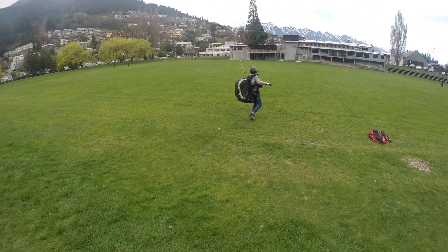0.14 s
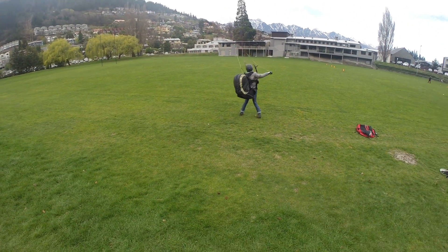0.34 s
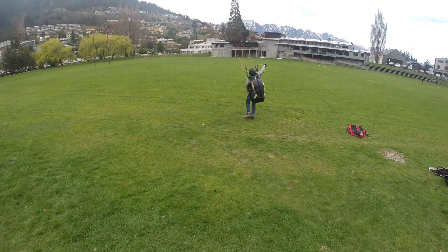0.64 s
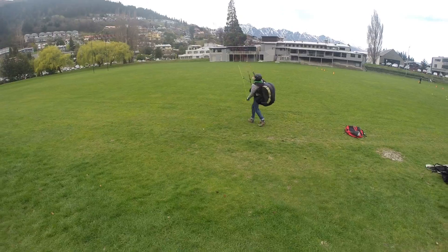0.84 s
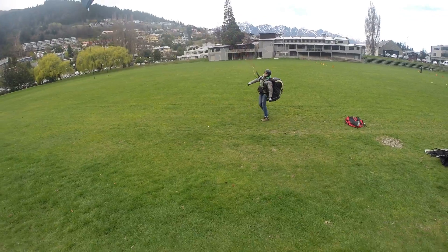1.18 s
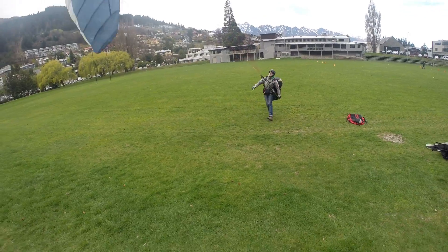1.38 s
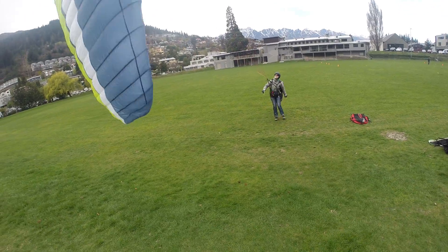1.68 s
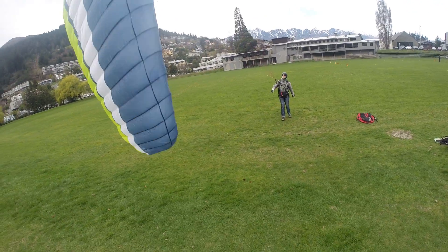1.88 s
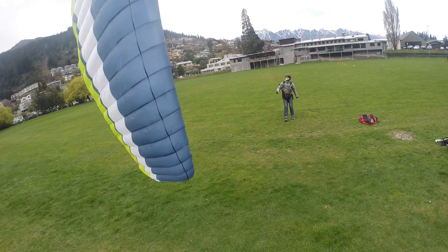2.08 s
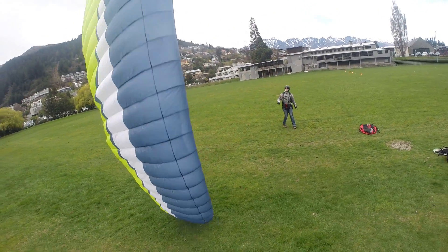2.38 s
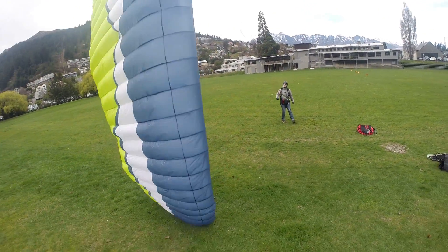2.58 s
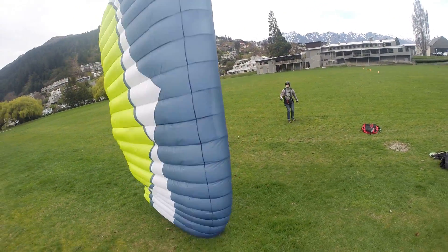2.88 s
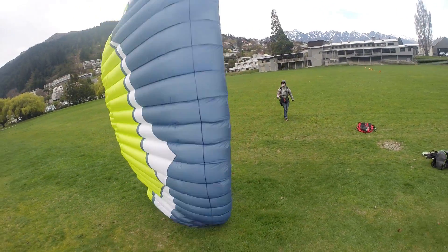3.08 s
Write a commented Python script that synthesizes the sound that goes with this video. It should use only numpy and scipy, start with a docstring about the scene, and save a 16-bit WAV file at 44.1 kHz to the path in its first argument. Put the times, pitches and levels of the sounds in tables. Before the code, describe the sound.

Low wavering wind rumble shakes a cased camera, fabric rustles onto grass, then a sharp hard knock

```python
"""A low wavering rumble and an airy rush are heard first: wind shakes a cased camera on its mount and blows past it.
The mount is a frequency-modulated sine with noise, plus jolts and ticks that are impacts ringing damped modes.
Rush and fabric are coloured noise with random grains; the fabric swells as a paraglider wing sinks onto grass.
A hard knock on the case comes near the end, over faint field ambience and thin top hiss; a limiter ducks around it."""
import sys
import numpy as np
from scipy import signal
from scipy.fft import rfft, irfft
from scipy.io import wavfile
from scipy.ndimage import uniform_filter1d, minimum_filter1d

SR = 44100
rng = np.random.default_rng(int(sys.argv[2]) if len(sys.argv) > 2 else 0)


def persist_wave(psi):
    """Save psi, clipped to +-1, as 16-bit WAV."""
    counts = np.round(np.clip(psi, -1, 1) * 32767).astype(np.int16)
    wavfile.write(sys.argv[1], SR, np.atleast_2d(counts).T)


N = 142443
TIME = np.arange(N) / SR  # s
HZ = np.maximum(np.arange(N // 2 + 1) * SR / N, 1)  # bin frequencies, held at 1 Hz or more


def amp(db):
    """Decibel law: the amplitude ratio is 10 to the power dB/20."""
    return 10 ** (np.asarray(db) / 20)


def rms_one(x):
    """Power normalisation: scale a signal to rms 1."""
    return x / np.sqrt(np.mean(x ** 2) + 1e-20)


def curve(rows):
    """Amplitude envelope: levels interpolated linearly in dB over time, as gain."""
    return amp(np.interp(TIME, *np.transpose(rows)))


def drift(rate):
    """Low-pass random process: noise falling off above the rate in Hz, rms 1."""
    spectrum = rfft(rng.standard_normal(N))
    return rms_one(irfft(spectrum / (1 + (HZ / rate) ** 2), N))


def coloured(source, spectrum, patchy_db, rate):
    """Spectral shaping: filter a source, then modulate its half-octave-spaced bands at random; rms 1."""
    hz, db = np.transpose(spectrum)
    octave, low, high = np.log2(HZ), np.log2(hz[0]), np.log2(hz[-1])
    # beyond the table the spectrum falls by 40 dB per octave
    outside = np.maximum(low - octave, 0) + np.maximum(octave - high, 0)
    shaped = rfft(source) * amp(np.interp(octave, np.log2(hz), db) - 40 * outside)
    together = drift(rate)
    out = 0
    for centre in np.arange(low - 1, high + 1, .5):
        share = np.clip(1 - 2 * np.abs(octave - centre), 0, 1)  # overlapping triangular bands
        flicker = amp(patchy_db * (0.58 * together + drift(rate)))  # partly common to all bands
        out = out + irfft(shaped * share, N) * flicker
    return rms_one(out)


def evened(x, span_s):
    """Automatic gain: reduce the power swells of a noise that are slower than the span; rms 1."""
    power = uniform_filter1d(x ** 2, size=int(span_s * SR))
    return rms_one(x / np.sqrt(power + 0.099))


def struck(events, modes, contact_s, spread_db):
    """Modal synthesis: each half-sine contact rings damped resonators, with random strength per mode."""
    s, db, *dull = np.transpose(events)  # the optional third column dulls the event
    chance = rng.standard_normal((len(s), len(modes)))
    contact = np.sin(np.linspace(0, np.pi, max(int(contact_s * SR), 1) + 2)[1:-1])
    out = np.zeros(N)
    for k, (hz, mode_db, t60) in enumerate(modes):
        clicks = np.full(N, 1e-18)
        loss_db = sum(dull) * max(np.log2(hz / modes[1][0]), 0)  # per octave above the second mode
        clicks[(s * SR).astype(int)] = amp(db + mode_db - loss_db + spread_db * chance[:, k])
        radius = amp(-60 / (t60 * SR))  # 60 dB of decay in t60
        angle = 2 * np.pi * hz / SR
        out += signal.lfilter([0, np.sin(angle)], [1, -2 * radius * np.cos(angle), radius * radius], clicks)
    return signal.lfilter(contact / contact.sum(), 1, out)


def crinkle(per_s):
    """Random impulse train: sparse grains of uneven strength at a mean rate per second, rms 1."""
    present = rng.random(N) < per_s / SR
    return rms_one(present * rng.standard_normal(N) * rng.exponential(1, N))


def mount_sway():
    """Frequency modulation: a slow rocking of the mount as a wavering sine joined by low noise."""
    # rocking envelope: t/s, level/dB
    sway_level = [(0.0, -33), (0.07, -39.5), (0.1, -35), (0.13, -38.5), (0.34, -33), (0.44, -46),
                  (0.48, -35), (0.69, -38), (0.72, -33.5), (0.83, -33.5), (0.88, -42.5), (1.03, -37),
                  (1.07, -44.5), (1.19, -30), (1.23, -37), (1.33, -33.5), (1.36, -43), (1.41, -32.5),
                  (1.63, -35.5), (1.67, -47), (1.71, -31), (1.75, -44), (1.8, -34), (1.86, -44),
                  (1.9, -31.5), (2.08, -34.5), (2.13, -30.5), (2.31, -42.5), (2.34, -26), (2.38, -41.5),
                  (2.51, -39.5), (2.57, -37.5), (2.68, -41.5), (2.72, -32.5), (2.75, -41), (3.02, -39.5),
                  (3.05, -30.5), (3.1, -35), (3.14, -37.5), (3.2, -37)]
    # noise spectrum of the rocking: f/Hz, level per Hz/dB
    sway_colour = [(15, 6), (26, -1), (40, -4.5), (52, -21.5), (65, 0)]
    centre_hz, wander_hz, noise_db = 38.14, 6, -5.5
    hz = centre_hz + wander_hz * drift(12.15)
    swing = np.sqrt(2) * np.sin(2 * np.pi * np.cumsum(hz) / SR)
    noise = coloured(rng.standard_normal(N), sway_colour, patchy_db=2.0, rate=3.3)
    return curve(sway_level) * (swing + amp(noise_db) * noise)


def mount_shake():
    """Band-shaped noise: faster lumpy shaking of the mount, its chance swells reduced under an envelope."""
    # shaking envelope: t/s, level/dB
    shake_level = [(0.0, -38.5), (0.07, -33.5), (0.11, -47), (0.18, -54.5), (0.24, -31.5), (0.28, -69),
                   (0.3, -31.5), (0.34, -31.5), (0.37, -43.5), (0.54, -44.5), (0.58, -28), (0.68, -46),
                   (0.7, -32), (0.73, -40), (0.76, -30.5), (0.8, -33), (0.85, -49), (0.88, -34),
                   (0.92, -42), (0.96, -31), (1.01, -44.5), (1.1, -37), (1.21, -35), (1.29, -50.5),
                   (1.47, -33), (1.51, -43.5), (1.53, -29.5), (1.59, -41.5), (1.61, -28), (1.62, -28),
                   (1.65, -47.5), (1.81, -46.5), (1.87, -30.5), (1.97, -46), (2.02, -36), (2.08, -50),
                   (2.09, -38), (2.32, -43.5), (2.36, -40.5), (2.55, -49.5), (2.58, -31.5), (2.66, -49),
                   (2.79, -31), (2.85, -44), (2.89, -52), (2.9, -35), (2.99, -37), (3.02, -58), (3.05, -39),
                   (3.2, -38.5)]
    # shaking spectrum: f/Hz, level per Hz/dB
    shake_colour = [(32, -34), (55, -10), (65, -3.5), (124, 3.5), (138, -3.5), (167, -21.5), (214, -10.5),
                    (275, -37), (316, -33.5), (410, -30), (472, -42), (600, -37), (780, -51), (1320, -120)]
    noise = coloured(rng.standard_normal(N), shake_colour, patchy_db=0.55, rate=41)
    return curve(shake_level) * evened(noise, span_s=0.0314)


def mount_jolts():
    """Impulse response: single jolts and many small random ones ring the modes of the mount."""
    # single jolts: t/s, strike level/dB
    jolts = [(0.033, -65), (0.223, -56), (0.293, -42), (0.329, -34.5), (0.572, -32.5), (0.696, -39),
             (0.741, -43), (1.065, -36.5), (1.149, -42), (1.447, -65), (1.537, -43), (1.589, -63),
             (1.862, -40.5), (1.902, -41), (2.581, -61), (2.684, -52), (2.771, -39), (2.933, -39)]
    # mount resonances: f/Hz, level/dB, 60 dB decay time/s
    mount_modes = [(83.5, 9, 0.052), (119, -7, 0.089), (226, -8.5, 0.12), (304, -8, .03),
                   (400, -4.5, 0.041), (527, -12, 0.024), (820, -13, 0.019)]
    small_per_s, small_db, small_spread_db = 21, -53.5, 4.4
    when = np.flatnonzero(rng.random(N) < small_per_s / SR) / SR
    small = np.column_stack([when, small_db + small_spread_db * rng.standard_normal(len(when))])
    return struck(np.vstack([jolts, small]), mount_modes, contact_s=0.001, spread_db=1.5)


def loose_ticks():
    """Impact excitation: brief contacts of a loose part ring its higher modes."""
    # ticks: t/s, strike level/dB, loss above the second mode/dB per octave (negative brightens)
    ticks = [(.3295, -41, 17), (.7721, -38, 16), (.885, -42, 20), (1.0652, -40, -5.5), (1.8332, -40, 4),
             (1.9036, -43, -12.5), (2.583, -44, -10), (3.009, -45, 6), (3.1236, -34.5, 7)]
    # resonances of the loose part: f/Hz, level/dB, 60 dB decay time/s
    tick_modes = [(620, -14, 0.021), (1260, -4, 0.015), (2080, -3.5, 0.021), (2170, -4.5, 0.016),
                  (2670, -12, 0.009), (3100, -10, 0.013)]
    return struck(ticks, tick_modes, contact_s=.0003, spread_db=2.5)


def case_knock():
    """Impact excitation: a cluster of very short contacts rings the stiff, heavily damped case."""
    # contacts before limiting: t/s, strike level/dB
    contacts = [(3.2288, -24), (3.22905, -11), (3.22940, 6), (3.22976, 2.5)]
    # case resonances: f/Hz, level/dB, 60 dB decay time/s
    case_modes = [(875, -31, 0.0069), (3130, 0, 0.0087), (5220, -7.5, 0.01), (7400, -15, 0.0059),
                  (10500, -27, .002), (14300, -26, .001)]
    return -struck(contacts, case_modes, contact_s=.00003, spread_db=0)


def fabric_landing():
    """Friction noise: the wing's edge drags and folds on the grass as hiss with crisp grain."""
    # sliding and crumpling envelope: t/s, level/dB
    landing_level = [(2.5, -94), (2.58, -59.5), (2.65, -50.5), (2.68, -52), (2.72, -52.5), (2.81, -56.5),
                     (2.85, -53), (2.87, -54), (2.93, -52), (2.97, -50.5), (3.0, -48), (3.012, -45.5),
                     (3.04, -49), (3.09, -49.5), (3.115, -44), (3.14, -45.5), (3.17, -49.5), (3.19, -48),
                     (3.23, -45.5)]
    # fabric spectrum: f/Hz, level per Hz/dB
    landing_colour = [(470, -39), (800, -22), (1170, -6.5), (1270, -16.5), (1710, -12), (2010, -6.5),
                      (2270, -15.5), (2600, -10.5), (2970, 0), (3200, -1), (3990, -7), (4620, -5.5),
                      (5160, -18.5), (6130, -7.5), (6680, -15.5), (7930, -24.5), (11300, -31.5),
                      (12300, -37), (15000, -46)]
    grains_per_s, grain_db = 1500, -10.5
    source = rng.standard_normal(N) + amp(grain_db) * crinkle(grains_per_s)
    return curve(landing_level) * coloured(source, landing_colour, patchy_db=1.1, rate=29)


def air_rush():
    """Turbulence noise: wind reaches the microphone through the case, with a fine fabric grain."""
    # rush envelope: t/s, level/dB
    rush_level = [(0, -52.5), (.05, -53), (.14, -56.5), (.3, -55), (.41, -61), (.49, -56), (.58, -59),
                  (.8, -61.5), (.96, -60), (1.2, -60.5), (1.28, -63), (1.6, -62.5), (1.9, -63),
                  (2.0, -66.5), (2.2, -61), (2.28, -63), (2.38, -62), (2.46, -61), (2.53, -57.5),
                  (2.7, -68)]
    # rush spectrum through the case: f/Hz, level per Hz/dB
    rush_colour = [(1350, -30), (2300, -15.5), (2610, -17.5), (2820, -7.5), (3120, -2), (3740, -10),
                   (4010, -15), (4550, -10), (5040, -19), (6180, -11), (6580, -18.5), (6900, -26),
                   (7290, -26.5), (8200, -28), (8660, -28), (9970, -25), (10800, -36), (14200, -35),
                   (15000, -37)]
    grains_per_s, grain_db = 2800, -8
    source = rng.standard_normal(N) + amp(grain_db) * crinkle(grains_per_s)
    return curve(rush_level) * coloured(source, rush_colour, patchy_db=0.48, rate=36)


def fabric_rustles():
    """Amplitude modulation: Gaussian swells shape a duller, grainy fabric noise."""
    # rustles: t/s, level/dB, Gaussian standard deviation/s
    swells = [(1.727, -60, 0.03), (1.826, -63.5, .03), (2.11, -65, .03), (2.182, -56, 0.024),
              (2.247, -64, 0.037), (2.683, -60, 0.034), (3.02, -54, 0.025), (3.14, -61, .03)]
    # dull fabric spectrum: f/Hz, level per Hz/dB
    rustle_colour = [(600, -6), (1200, -10), (1600, -12.5), (2050, -3.5), (2600, -6), (4000, -42)]
    envelope = sum(amp(db) * np.exp(-.5 * ((TIME - s) / length) ** 2) for s, db, length in swells)
    source = rng.standard_normal(N) + 0.55 * crinkle(4000)
    return envelope * coloured(source, rustle_colour, patchy_db=-1.5, rate=19)


def field_ambience():
    """Stationary noise: the distant field as a steady, gently flickering coloured noise."""
    # field spectrum: f/Hz, level per Hz/dB
    field_colour = [(250, -0.5), (356, -10.5), (395, -7.5), (568, -11), (927, -13), (1840, -14),
                    (2460, -16.5), (2680, -19), (3400, -25), (5200, -28), (5800, -24), (6050, -15.5),
                    (6500, -23), (8000, -32.5), (9600, -29.5), (12000, -36.5)]
    return amp(-59.5) * coloured(rng.standard_normal(N), field_colour, patchy_db=-0.4, rate=24)


def top_hiss():
    """Narrow-band noise: a thin high hiss whose level rises and falls."""
    # hiss envelope: t/s, level/dB
    hiss_level = [(0.05, -94), (0.06, -82), (0.62, -86), (0.67, -77), (0.73, -111), (0.9, -75), (0.94, -88),
                  (1.04, -79), (1.09, -88), (1.15, -73.5), (1.37, -82), (1.45, -73), (2.95, -82),
                  (3.2, -74)]
    # hiss spectrum: f/Hz, level per Hz/dB
    hiss_colour = [(12000, -13.5), (12900, -4), (13500, -2), (13900, -17.5), (15000, -17.5)]
    return curve(hiss_level) * coloured(rng.standard_normal(N), hiss_colour, patchy_db=3.0, rate=30)


def scene():
    """Superposition: the pressures of all sources add at one microphone."""
    mount = mount_sway() + mount_shake() + mount_jolts()
    impacts = loose_ticks() + case_knock()
    fabric = fabric_landing() + fabric_rustles()
    air = air_rush() + field_ambience() + top_hiss()
    return (mount + impacts + fabric + air)[None]


def record(dry):
    """Peak limiting: a look-ahead gain ducks the sound around loud peaks, then a low-pass cuts the top."""
    ceiling, look_ahead_s, cutoff_hz = 0.67, 0.0195, 15000
    ahead = int(look_ahead_s * SR)
    need = np.minimum(1, ceiling / (np.abs(dry) + 1e-9))
    gain = minimum_filter1d(need, size=2 * ahead + 1, mode="nearest")  # held before and after each peak
    limited = dry * uniform_filter1d(gain, size=45)
    low_pass = signal.ellip(10, .5, 70, cutoff_hz, fs=SR, output="sos")
    return signal.sosfilt(low_pass, limited)


dry = scene()
out = record(dry)
persist_wave(out)
```